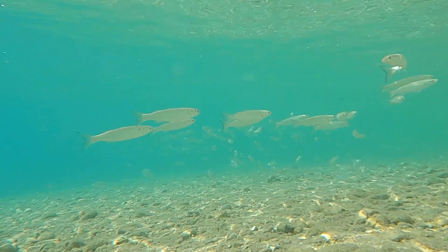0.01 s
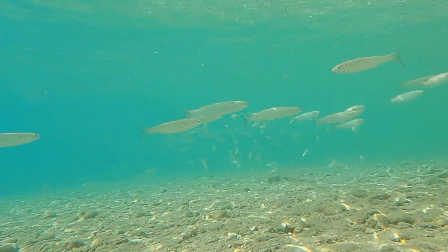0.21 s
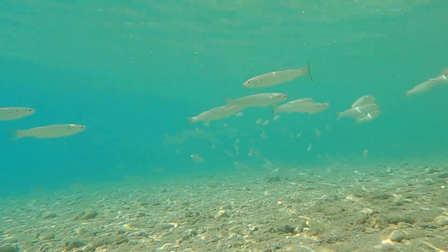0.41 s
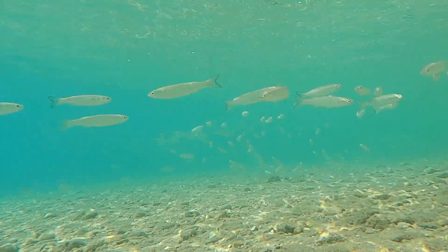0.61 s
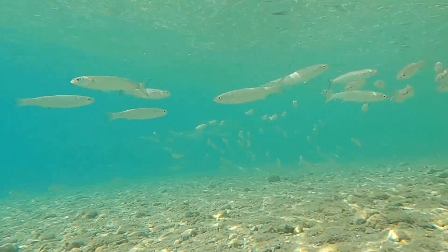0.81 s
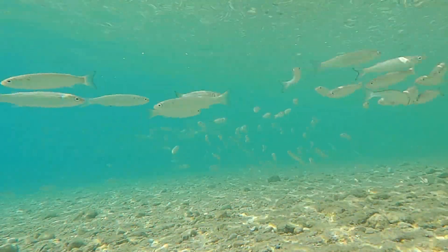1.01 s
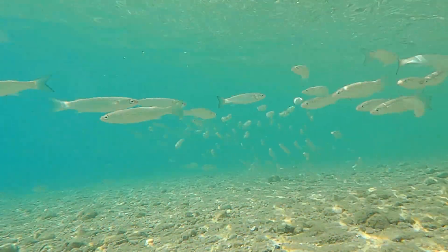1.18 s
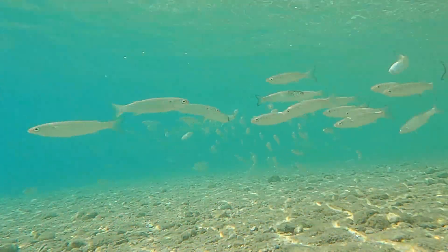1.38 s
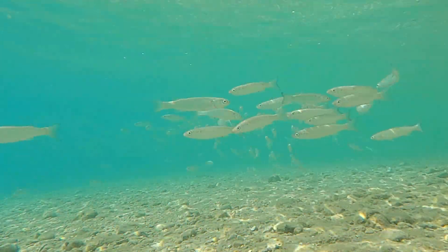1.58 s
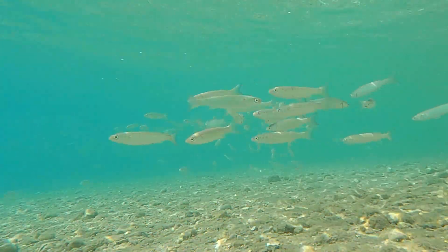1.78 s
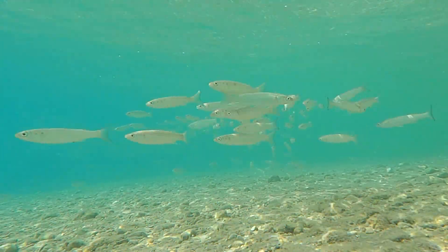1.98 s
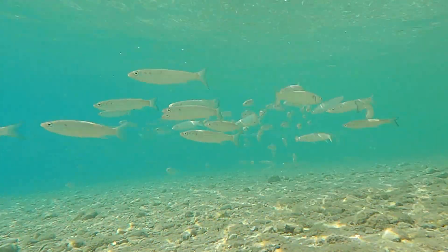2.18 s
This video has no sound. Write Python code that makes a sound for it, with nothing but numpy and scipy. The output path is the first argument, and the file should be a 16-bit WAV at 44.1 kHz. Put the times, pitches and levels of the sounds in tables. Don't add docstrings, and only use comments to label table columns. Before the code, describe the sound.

Snapping shrimp crackle underwater, dense and distant as a steady hiss, with irregular nearer clicks, two standing out loudest; soft low thuds and gurgles nudge the sealed camera housing in shallow sea.

```python
import sys
import numpy as np
from scipy import signal
from scipy.fft import rfft, irfft, next_fast_len
from scipy.io import wavfile
from scipy.ndimage import uniform_filter1d, map_coordinates

SR = 44100
rng = np.random.default_rng(int(sys.argv[2]) if len(sys.argv) > 2 else 0)


def put_to_file(sound):
    columns = np.atleast_2d(sound).T
    safe = np.clip(columns, -1, 1)
    whole_steps = np.round(safe * 32767)
    wavfile.write(sys.argv[1], SR, whole_steps.astype(np.int16))


def amplitude_ratio(level_db):
    exponent = np.asarray(level_db, float) / 20
    return 10 ** exponent


N = 99225


def unit(x):
    return x / np.sqrt(np.mean(x ** 2) + 1e-20)


def along(points, hz):
    f, value = np.transpose(points)
    return np.interp(np.log(hz + 1), np.log(f + 1), value)


def curves(rows):
    s, *columns = np.transpose(rows)
    return [np.interp(np.arange(N) / SR, s, column) for column in columns]


def wobble(rate_hz):
    knots = rng.standard_normal(int(N * rate_hz / SR) + 4)
    return map_coordinates(knots, [np.arange(N) * rate_hz / SR])


def filtered(x, response):
    m = next_fast_len(N + 8192)
    return irfft(rfft(x, m) * response(np.fft.rfftfreq(m, 1 / SR)), m)[..., :N]


def causal(points, hz):
    cepstrum = irfft(np.log(amplitude_ratio(along(points, hz))))
    half = len(cepstrum) // 2
    cepstrum[1:half] *= 2
    cepstrum[half + 1:] = 0
    return np.exp(rfft(cepstrum))


# centre in Hz, width in Hz, level in dB.
LOW_MODES = [(718, 98, -6), (1368, 178, -6.5), (1570, 188, -3), (1863, 240, -5)]
SECOND_MODES = [(2294, 142, -11), (2622, 81, -4), (3300, 650, -12)]
MID_MODES = [(3986, 215, 1), (4745, 356, -5.5), (4996, 225, -5)]
HIGH_MODES = [(5217, 260, -9.5), (6220, 310, -10.5), (6885, 266, -9), (7440, 340, -16.5)]
# frequency in Hz, gain in dB.
WALL_GAIN = [(300, -1), (1000, -2), (1300, 2), (7200, -1.5), (8000, 5), (10000, 0), (12300, -4),
             (14000, -40)]


def housing(*pushes):
    def ring(modes):
        def response(f):
            total = 0
            for k, (hz, width_hz, db) in enumerate(modes):
                damping = 1j * f * width_hz
                total = total + (-1) ** k * amplitude_ratio(db) * damping / (hz * hz - f * f + damping)
            return causal(WALL_GAIN, f) * total
        return response

    groups = [LOW_MODES, SECOND_MODES, MID_MODES, HIGH_MODES]
    return sum(filtered(push, ring(modes)) for push, modes in zip(pushes, groups))


def thin(x):
    floor_hz, bass_db, top_hz, treble_db = 1230, -11.5, 7420, -8.5
    shape = [(floor_hz * 0.98, bass_db), (floor_hz, 0), (2850, 0), (3250, -7), (3650, 0),
             (top_hz, 0), (top_hz * 1.04, treble_db)]
    return filtered(x, lambda f: causal(shape, f))


def top_ring(push):
    hz, width_hz = 11660, 1700

    def response(f):
        damping = 1j * f * width_hz
        return (damping / (hz ** 2 - f * f + damping)) ** 2
    return filtered(push, response)


# frequency in Hz, left-right correlation from 0 to 1.
PORT_LIKENESS = [(60, 0.94), (150, 0.85), (300, 0.67), (600, 0.39), (1300, 0.54), (3000, 0.94),
                 (6000, 0.95), (10000, 0.7)]
# frequency in Hz, left over right in dB.
LEFT_OVER_RIGHT_DB = [(60, -2), (130, 1.5), (280, -2.5), (600, 1), (1300, 1), (2790, 4), (6020, -2.5),
                      (13000, 5)]
# frequency in Hz, lead of the left in radians.
LEFT_LEAD_RAD = [(400, -0.044), (1200, -1.4), (1720, -0.74), (2400, -0.7), (3010, -1.32), (3700, -0.27),
                 (5900, -0.28), (7600, 0.91)]


def ports(mid, other):
    def angle(f):
        return np.arccos(np.clip(along(PORT_LIKENESS, f), -1, 1)) / 2

    def offset(f):
        half = np.array([[.5], [-.5]])
        return amplitude_ratio(half * along(LEFT_OVER_RIGHT_DB, f)) * np.exp(1j * half * along(LEFT_LEAD_RAD, f))

    m = filtered(mid, lambda f: np.cos(angle(f)))
    s = filtered(other, lambda f: np.sin(angle(f)))
    return filtered(np.array([m + s, m - s]), offset)


def bursts(times_s, levels_db, rise_s, t60_s):
    t = np.arange(1536) / SR
    noise = rng.standard_normal((len(times_s), len(levels_db), len(t)))
    noise *= (1 - np.exp(-(t / rise_s) ** 2)) * amplitude_ratio(-60 * t / t60_s)
    noise /= np.linalg.norm(noise, axis=2, keepdims=True)
    starts = np.round(times_s * SR).astype(int)
    at = (starts[:, None] + np.arange(len(t))).ravel()
    rows = []
    for group, db in enumerate(levels_db):
        weighted = noise[:, group] * amplitude_ratio(db)[:, None]
        rows.append(np.bincount(at, weighted.ravel(), N + SR)[:N])
    return np.array(rows)


# frequency in Hz, gain in dB.
PREAMP_COLOUR = [(8000, 3.5), (11000, -3.5), (12600, -9), (13400, -6)]


def preamp():
    level_db = -83.5
    left, right, shared = rng.standard_normal((3, N))
    pair = np.array([left, right]) + 2.0 * shared
    return filtered(pair, lambda f: amplitude_ratio(level_db + along(PREAMP_COLOUR, f)))


# time in seconds, hiss level in dB.
SEA_LEVEL = [(0.0, -52), (0.31, -54), (0.63, -53), (1.16, -55), (1.56, -53), (1.77, -55), (2.25, -54)]


def sea():
    snaps_per_s, spread_db, most_db, t60_s = 230, 4.5, 14.5, 0.0097
    crackle_db, top_db = -61, -28
    level_db, = curves(SEA_LEVEL)

    when, size, colour, _ = rng.random((int(snaps_per_s * N / SR), 4)).T
    size_db = np.minimum(-spread_db * np.log(size), most_db)
    group_db = size_db + 8 * (colour - .5) * np.array([[1], [.5], [0], [-1]])
    group_db = group_db + 4 * rng.standard_normal(group_db.shape)
    push = bursts(when * N / SR, group_db, 0.00024, t60_s)
    crackle = unit(thin(housing(*push))) + amplitude_ratio(top_db) * unit(top_ring(push[3]))

    hiss = []
    for noise in rng.standard_normal((2, 4, N)):
        pushes = [group * amplitude_ratio(2.27 * wobble(25.27)) for group in noise]
        hiss.append(unit(housing(*pushes)))
    crackle_level_db = crackle_db + level_db - level_db.mean()
    return amplitude_ratio(level_db - 2.5) * ports(*hiss) + amplitude_ratio(crackle_level_db) * ports(crackle, np.zeros(N))


# time in seconds, gurgle level in dB.
SWELL_LEVEL = [(0.0, -52.5), (0.19, -58.5), (0.23, -56), (0.29, -58), (0.68, -58), (0.76, -49.5),
               (0.88, -60), (0.93, -52), (1.14, -63), (1.44, -52.5), (1.48, -65.5), (1.97, -54),
               (2.23, -58.5), (2.25, -50)]
# frequency in Hz, density in dB per Hz.
RUMBLE_SHAPE = [(8, -56), (22, 4), (36, 3), (60, 1), (90, -16), (160, -48)]
GURGLE_SHAPE = [(60, -31), (110, -15.5), (150, -2), (215, -3), (290, -12), (450, -21), (700, -20),
                (1200, -59)]
# centre in seconds, peak in dB, length in seconds.
SHOVES = [(0.02, -56, 0.068), (0.201, -42.5, 0.045), (0.253, -37, 0.051), (0.291, -40.5, 0.032),
          (0.326, -52, 0.037), (0.398, -46.5, 0.044), (0.439, -53, 0.037), (0.529, -52, 0.04),
          (0.603, -57, 0.044), (0.74, -44, 0.041), (0.768, -38.5, 0.045), (0.821, -47.5, 0.036),
          (0.956, -51, 0.065), (1.352, -57, 0.068), (1.44, -47.5, 0.036), (1.502, -56, 0.053),
          (1.55, -56, 0.047), (1.688, -61, 0.028), (1.802, -61, 0.036), (1.965, -55.5, 0.044),
          (2.046, -52, 0.06), (2.106, -53, 0.058), (2.24, -64, 0.062)]


def swell():
    rumble_db, shove_cycles, edge = -79, 1.66, 0.28
    gurgle_db = curves(SWELL_LEVEL)[-1]

    def band(shape):
        return filtered(rng.standard_normal((2, N)), lambda f: amplitude_ratio(along(shape, f)))

    rumble = unit(band(RUMBLE_SHAPE) * amplitude_ratio(3.6 * wobble(9.3))) * amplitude_ratio(rumble_db)
    gurgle = unit(band(GURGLE_SHAPE) * amplitude_ratio(2.8 * wobble(22.38))) * amplitude_ratio(gurgle_db - 3.5)
    shoves = np.zeros(N)
    for s, db, length_s in SHOVES:
        start_rad = rng.uniform(-0.87, 1)
        u = (np.arange(N) / SR - s) / length_s
        sway = np.cos(2 * np.pi * shove_cycles * u + start_rad)
        sway += edge * np.cos(2 * np.pi * 2.1 * shove_cycles * u + 3 * start_rad)
        shoves += amplitude_ratio(db) * np.exp(-(2 * u) ** 2) * sway
    return ports(*(rumble + gurgle + shoves * [[1], [.6]]))


NEAR_SNAPS = [(0.2055, -24, -28, -22, -26), (0.3837, -10, -13.5, -11, -16.5), (0.4648, -24, -20, -15, -9.5),
              (0.521, -23.5, -33, -25, -11), (0.633, -39.5, -16, -14, -5.5), (0.67, -24.5, -16, -22, -11),
              (0.712, -41, -11, -18, -32), (0.7322, -20, -13.5, -15, -47), (0.7576, -21, -21, -17.5, -25),
              (0.8283, -26.5, -14.5, -10, -14.5), (0.9688, -22, -48, -22, -26.5),
              (1.1135, -13.5, -17.5, -34, -22), (1.2235, -28.5, -20, -18, -24),
              (1.33, -19, -25.5, -23, -28), (1.3709, -30, -23, -29, -20), (1.412, -6.5, -12.5, -11, -17.5),
              (1.4356, -16, -8, -9, -38), (1.497, -22, -21, -26, -48), (1.6287, -29.5, -30, -17, -12.5),
              (1.6766, -25, -13, -11.5, -16.5), (1.937, -34, -34, -15, -7.5),
              (1.9642, -30.5, -17.5, -8.5, -14), (1.985, -16, -37, -23, -21), (2.023, -19, -24.5, -28, -20),
              (1.4066, -30, -26, -22, -20)]
FAINT_SNAPS = [(0.0655, -45, -5, -22), (0.0803, -34.5, -22, -26), (0.1251, -45, -4, -24),
               (0.1494, -52, -6, -12), (0.3326, -42, -24, -12), (0.621, -39, -11, -23),
               (0.8924, -48, -14, -6), (0.9924, -39.5, -20, -9), (1.0615, -38, -20, -14),
               (1.1158, -21.5, -14, -21.5), (1.3202, -32, -27, -13.5), (1.5936, -39.5, -28, -10),
               (1.6501, -41, -11, -9), (1.721, -36, -25, -14), (1.8042, -41.5, -22, -8),
               (1.8681, -37.5, -12, -9.5), (1.8864, -35, -25, -19), (1.917, -41.5, -33, -15),
               (1.9444, -41, -18, -20), (1.9917, -37, -13, -10), (2.0469, -40, -11, -18),
               (2.0647, -34.5, -17.5, -19), (2.1231, -39, -17, -14), (2.1495, -43, -8, -18),
               (2.174, -42, -22, -16), (2.1986, -42, -18, -18), (2.2114, -37, -19, -15),
               (2.2178, -34.5, -25, -10)]
FAINT_LIFT_DB = [6.5, -4, -8, -5.5]
# delay in seconds, level in dB.
BOUNCES = [
    (.007, -17.5),
    (0.018, -64),
    (.029, -24),
]


def snaps():
    rise_s, t60_s, snap_db, low_lift_db, high_lift_db = .0017, 0.01, 21, 13.5, 16.5
    tail_t60_s, tail_db, tail_unlike, low_lag_s = 0.13, -19, 2.2, 0.001046
    rows = list(NEAR_SNAPS)
    for s, db, low, high in FAINT_SNAPS:
        rows.append(np.add((s, db, low, low, high), [0, *FAINT_LIFT_DB]))
    s, db, low_db, second_db, high_db = np.transpose(rows)
    levels_db = snap_db + db + np.array([low_db + low_lift_db, second_db + low_lift_db + 3,
                                         0 * db, high_db + high_lift_db])

    paths = [(0, 0.0054)] + list(BOUNCES)
    push = sum(bursts(s + lag_s - rise_s / 2, levels_db + path_db, rise_s, t60_s) for lag_s, path_db in paths)
    push[0] = np.roll(push[0], round(low_lag_s * SR))
    tail, other = (bursts(s, levels_db + tail_db, 0.01, tail_t60_s) for port in range(2))
    return ports(thin(housing(*(push + tail))), tail_unlike * thin(housing(*other)))


# start in seconds, peak in dB, pitch in Hz,
# t60 in seconds.
GULPS = [(0.222, -34, 129.3, 0.12), (0.373, -44, 137, 0.078), (.383, -19, 2400, .018),
         (.3835, -18, 3950, .018), (.3845, -24, 1830, .025), (.384, -47, 745, .04),
         (0.522, -44.5, 248, 0.027), (.741, -50, 690, 0.035), (.744, -50, 460, 0.03),
         (.745, -38, 254, 0.055), (0.793, -47.5, 198, 0.066), (.83, -52, 270, .04),
         (1.115, -34, 1360, .035), (1.40, -50, 209, 0.034), (1.412, -49, 722, 0.058),
         (1.672, -50, 206, 0.084), (2.012, -45.5, 230, 0.083)]


def gulps():
    rise_s, sag, overtone_db, puff_db = 0.0029, 0.067, -18, -33
    out, t = np.zeros(N + SR), np.arange(SR // 5) / SR
    for s, db, hz, t60_s in GULPS:
        decay_db = -60 * t / t60_s
        phase = 2 * np.pi * hz * (t - sag * t * t / t60_s)
        tone = np.sin(phase) + amplitude_ratio(overtone_db + decay_db) * np.sin(2.82 * phase)
        puff = uniform_filter1d(rng.standard_normal(len(t)), size=25)
        tone += amplitude_ratio(puff_db) * unit(uniform_filter1d(puff, size=25))
        envelope = amplitude_ratio(db + 4.0 + decay_db) * (1 - np.exp(-(t / rise_s) ** 2))
        out[round(s * SR):][:len(t)] += envelope * tone
    return ports(out[:N], np.zeros(N))


# start in seconds, length in seconds, level in dB.
SPRAY_PUFFS = [
    (.325, .035, -92),
    (.525, .12, -84),
    (.685, .012, -88),
    (.71, .012, -88),
]


def spray():
    centre_hz, width_hz = 14700, 1100
    t = np.arange(N) / SR
    gate = sum(amplitude_ratio(db) * np.exp(-(2 * (t - s - length_s / 2) / length_s) ** 4)
               for s, length_s, db in SPRAY_PUFFS)
    noise = rng.standard_normal((2, N))
    pair = filtered(noise, lambda f: np.exp(-((f - centre_hz) / width_hz) ** 4))
    return ports(*(unit(pair) * gate))


# time in seconds, peak in dB.
TICKS = [(0.3835, -49), (.4648, -60), (.5217, -58), (.6704, -60), (0.9747, -42), (0.9996, -57),
         (1.1134, -61), (1.4117, -45), (1.4361, -59), (1.6282, -53), (1.6766, -49), (1.938, -60),
         (1.9844, -52), (2.0228, -57)]


def ticks():
    s, db = np.transpose(TICKS)
    push = bursts(s - .001, [db + 15.5], 0.0013, 0.013)[0]
    return ports(top_ring(push), np.zeros(N))


def fizz():
    peak_s, rise_s, fall_s, level_db = 0.48, 0.056, 0.26, -70.5
    centre_hz, width_hz = 12000, 630
    skirt_hz, skirt_width_hz, skirt_db = 10000, 3100, -7
    t = np.arange(N) / SR - peak_s
    envelope = np.exp(-(t / np.where(t < 0, rise_s, fall_s)) ** 2)

    def colour(f):
        peak = np.exp(-((f - centre_hz) / width_hz) ** 2)
        return peak + amplitude_ratio(skirt_db) * np.exp(-((f - skirt_hz) / skirt_width_hz) ** 4)

    pair = unit(filtered(rng.standard_normal((2, N)), colour))
    return amplitude_ratio(level_db) * ports(*(pair * envelope * amplitude_ratio(3.0 * wobble(57.9))))


def wavering_edge(x):
    low_edge_hz, high_edge_hz, wavers_per_s = 12650, 13350, 9
    low, high = (filtered(x, lambda f: f < edge_hz) for edge_hz in (low_edge_hz, high_edge_hz))
    return low + (high - low) * np.clip(.5 + 2 * wobble(wavers_per_s), 0, 1)


def scene():
    below_edge = snaps() + sea() + swell() + gulps() + fizz() + preamp()
    return wavering_edge(below_edge) + ticks() + spray()


def top_cut(x):
    return signal.sosfilt(signal.butter(12, 15700, fs=SR, output="sos"), x)


def record(dry):
    return top_cut(dry)


dry = scene()
out = record(dry)
put_to_file(out)
```